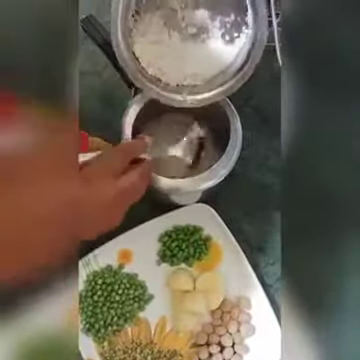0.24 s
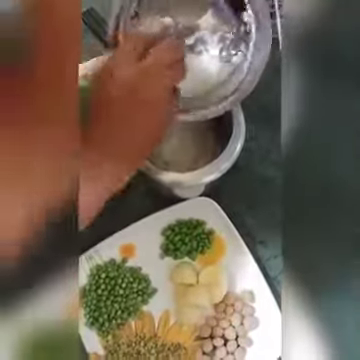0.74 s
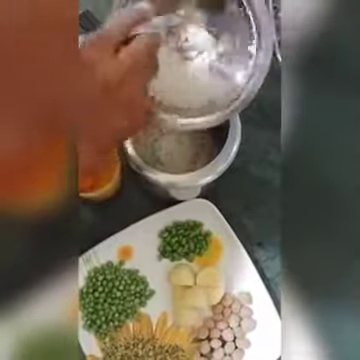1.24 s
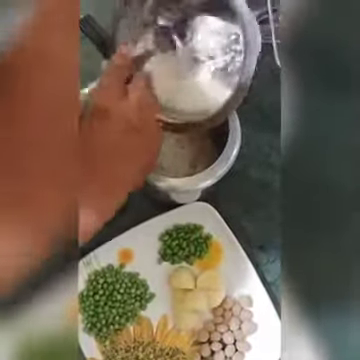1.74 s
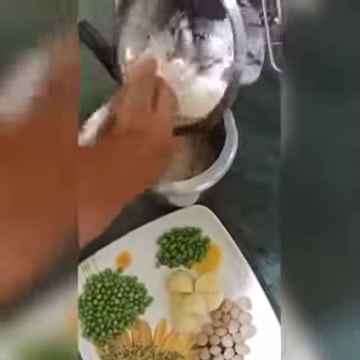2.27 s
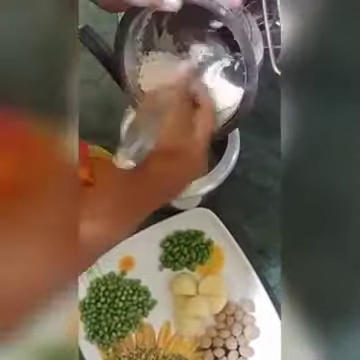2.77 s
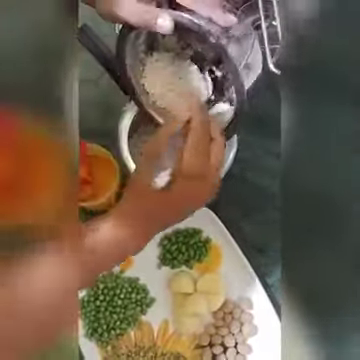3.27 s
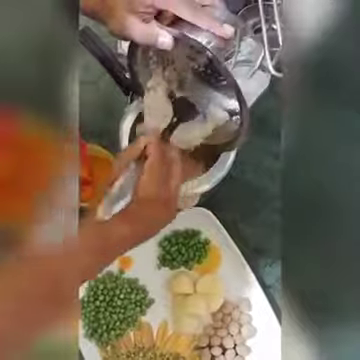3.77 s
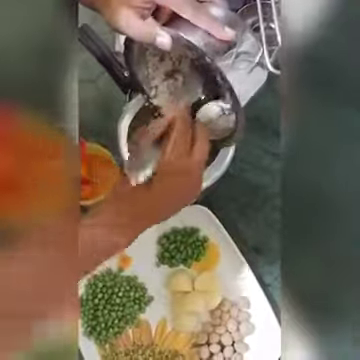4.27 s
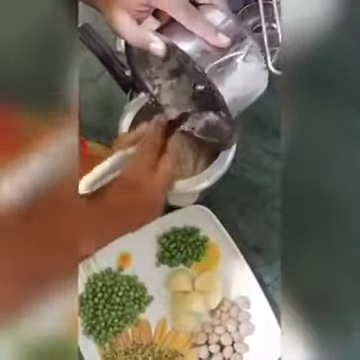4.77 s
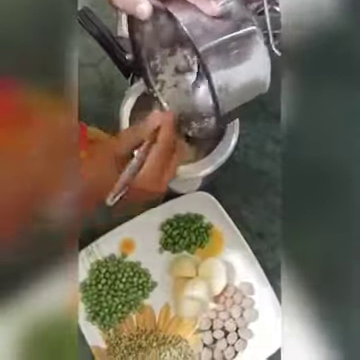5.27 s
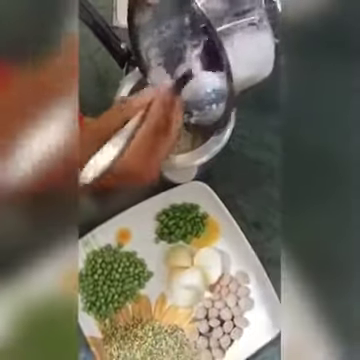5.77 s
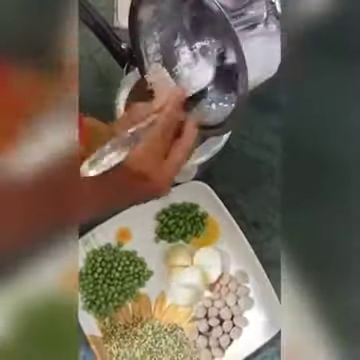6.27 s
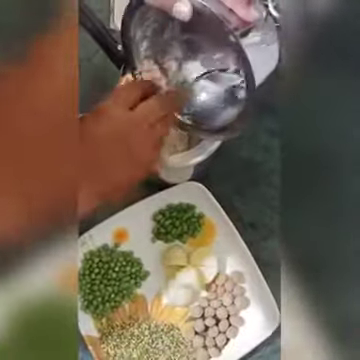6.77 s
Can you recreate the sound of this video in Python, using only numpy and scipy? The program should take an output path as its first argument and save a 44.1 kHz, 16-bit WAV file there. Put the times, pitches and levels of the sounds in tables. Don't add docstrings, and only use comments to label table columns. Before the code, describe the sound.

Sharp steel spoon clinks, low hollow thumps and gritty scrapes as damp rice is knocked from a thin metal bowl, close in a small kitchen.

```python
import sys
import numpy as np
from scipy import signal
from scipy.fft import rfft, irfft, next_fast_len
from scipy.io import wavfile
from scipy.ndimage import uniform_filter1d, map_coordinates

SR = 44100
rng = np.random.default_rng(int(sys.argv[2]) if len(sys.argv) > 2 else 0)


def nominal_scale(level):
    x = np.asarray(level, float) / 20
    return 10 ** x


def file_out(sig):
    cols = np.atleast_2d(sig).T
    lim = np.clip(cols, -1, 1)
    pcm = np.round(lim * 32767).astype(np.int16)
    wavfile.write(sys.argv[1], SR, pcm)


N = 309141
RING = 12000


def unit(x):
    return x / np.sqrt(np.mean(x ** 2) + 1e-20)


def along(points, hz):
    f, v = np.transpose(points)
    return np.interp(np.log(hz + 1), np.log(f + 1), v)


def filtered(x, response):
    m = next_fast_len(N + SR // 2)
    return irfft(rfft(x, m) * response(np.fft.rfftfreq(m, 1 / SR)), m)[..., :N]


def wobble(rate_hz):
    knots = rng.standard_normal(int(N * rate_hz / SR) + 4)
    return map_coordinates(knots, [np.arange(N) * rate_hz / SR])


def floor():
    # f/Hz, level/dB per Hz
    quiet = [(15, -67.5), (25, -7), (33, -13), (134, -9.5), (195, -12.5), (277, -22), (354, -9.5),
             (384, -21.5), (545, -17), (591, -31), (714, -19), (4140, -33), (7920, -39.5), (16000, -53.5)]
    level_db = -61.5 + 2.0
    likeness = [(40, .4), (200, .7), (1200, .05)]  # f/Hz, port correlation
    a, b = rng.standard_normal((2, N))

    def turn(hz):
        return np.arccos(np.clip(along(likeness, hz), 0, 1)) / 2

    mid = filtered(a, lambda hz: nominal_scale(along(quiet, hz)) * np.cos(turn(hz)))
    side = filtered(b, lambda hz: nominal_scale(along(quiet, hz)) * np.sin(turn(hz)))
    return nominal_scale(level_db + 0.71 * wobble(3.5)) * unit(np.array([mid + side, mid - side]))


def kitchen(x):
    # f/Hz, t60/s
    decay = [(200, 0.14), (2000, 0.15), (10000, 0.093)]
    # f/Hz, level/dB
    wet_db = [(100, -13.5), (500, -7.5), (1500, 1.5), (8000, -0.5)]
    hop, delay = SR // 6, 60
    starts = range(0, N, hop)
    hz, t, z = signal.stft(rng.standard_normal((len(starts), 2, SR // 3)), SR, nperseg=256)
    tails = signal.istft(z * nominal_scale(-60 * t / along(decay, hz)[:, None]), SR, nperseg=256)[1]
    tails /= np.linalg.norm(tails, axis=2, keepdims=True)
    padded = np.pad(x, (hop, 2 * hop))
    wet = np.zeros((2, N + SR + hop))
    fade = np.sin(np.pi * np.arange(2 * hop) / (2 * hop))
    for start, tail in zip(starts, tails):
        piece = padded[start:start + 2 * hop] * fade
        answer = signal.fftconvolve(piece[None], tail, axes=1)
        wet[:, start:start + answer.shape[1]] += answer
    return filtered(wet[:, hop - delay:][:, :N], lambda f: nominal_scale(along(wet_db, f)))


def grit(per_second, spread_db):
    draw = rng.random((3, N))
    size = nominal_scale(-spread_db * np.log(draw[2] + .03))
    ticks = (draw[0] < per_second / SR) * np.sign(draw[1] - .5) * size
    return unit(ticks) + 0.55 * rng.standard_normal(N)


def patchy(x, depth_db):
    z = signal.stft(x, nperseg=256)[2]
    field = uniform_filter1d(rng.standard_normal(z.shape), size=4, axis=0)
    field = uniform_filter1d(field, size=12, axis=1)
    return unit(signal.istft(z * nominal_scale(depth_db * unit(field)), nperseg=256)[1][:N])


def peaks(start, hold, db, rise_db_per_s, fall_db_per_s):
    t = np.arange(0, N / SR + .002, .001)[:, None]
    early = np.clip(start - t, 0, None)
    late = np.clip(t - start - hold, 0, None)
    gain = np.linalg.norm(nominal_scale(db - rise_db_per_s * early - fall_db_per_s * late), axis=1)
    return np.interp(np.arange(N) / SR, t[:, 0], gain)


def resonances(hz, modes):
    return sum((-1) ** k * nominal_scale(db) * 1j * hz * w / (c * c - hz * hz + 1j * hz * w)
               for k, (c, w, db) in enumerate(modes))


def strokes():
    # start t/s, hold/s, hiss level/dB, steel under it/dB
    scrapes = [(0.269, .008, -34, -27), (0.334, 0.027, -38, -40), (0.804, 0.18, -44.5, -7),
               (0.913, 0.045, -26, -26), (1.308, 0.027, -29.5, -12), (1.618, 0.16, -28, -16),
               (2.083, .17, -34, -6.5), (2.507, 0.11, -33, -33), (2.905, .04, -35.5, -9),
               (2.967, 0.061, -24, -27), (3.277, .15, -34, -15.5), (3.51, 0.15, -52, 9),
               (4.03, 0.081, -36, -21), (4.16, 0.19, -36, -6.5), (4.517, 0.082, -32.5, -18),
               (4.657, 0.072, -46.5, -4), (4.815, 0.081, -43, -13), (4.95, 0.085, -31.5, -3),
               (5.13, 0.1, -40.5, 4.5), (5.245, 0.087, -36.5, -8), (5.474, 0.018, -41, -3.5),
               (5.522, 0.051, -29.5, -19.5), (5.9, 0.082, -27.5, -43), (6.293, 0.035, -34, -13),
               (6.357, 0.04, -25, -11), (6.46, 0.076, -47.5, 0), (6.707, 0.098, -39, -15),
               (6.788, .01, -30.5, -3.5), (6.846, 0.11, -38.5, -1), (6.918, 0.0059, -32.5, -7)]
    # start t/s, hold/s, hiss level/dB
    trickles = [(0.693, 0.065, -54), (1.115, 0.09, -67.5), (1.494, 0.012, -64), (1.907, 0.036, -63),
                (2.333, 0.064, -56.5), (3.175, 0.038, -55), (3.653, 0.052, -58), (3.763, 0.14, -69.5),
                (3.913, 0.089, -50.5), (5.36, .08, -50.5), (2.664, 0.056, -59), (5.724, 0.017, -62),
                (6.18, .04, -54)]
    # t/s, steel drag level/dB, hollow rumble level/dB, fade/dB per s
    slides = [(0.0, -49, -50, 215), (0.789, -38.5, -30.5, 333), (0.92, -49, -41.5, 252),
              (1.33, -56, -43.5, 200), (1.499, -56, -42.5, 305.5), (1.59, -39.5, -40, 151),
              (2.078, -22.5, -31.5, 131), (2.562, -46, -38.5, 202), (2.89, -48, -35.5, 154.5),
              (3.269, -34.5, -32, 184), (3.411, -41, -42, 224), (3.6, -35.5, -35, 115.5),
              (3.91, -55, -37.5, 220), (4.16, -33.5, -27.5, 115), (4.623, -31.5, -30.5, 93),
              (4.81, -40, -31.5, 197.5), (4.88, -21.5, -49, 257), (5.001, -22.5, -53, 149),
              (5.298, -42, -36.5, 339), (5.658, -44, -30, 198.5), (5.888, -37, -33.5, 265),
              (6.018, -30, -26, 218), (6.29, -21.5, -27.5, 250), (6.374, -32.5, -31.5, 202),
              (6.688, -25, -25.5, 224), (6.789, -30.5, -32, 253), (6.905, -30, -36.5, 332)]
    # f/Hz, level/dB per Hz
    hiss_shape = [(2060, -27.5), (3500, -12.5), (4100, -13.5), (4400, -11.5), (4810, -11), (5500, -4.5),
                  (7040, -9.5), (8210, 1), (10100, -24), (11100, -20), (14400, -16.5), (15400, -20),
                  (16000, -65)]
    # f/Hz, level/dB per Hz
    drag_shape = [(470, -23), (800, -3), (1390, -8.5), (1750, -7.5), (1920, -14), (2450, -5.5), (5000, -14),
                  (6500, -21.5), (11000, -120)]
    # f/Hz, level/dB per Hz
    rumble_shape = [(35, -25.5), (60, 2.5), (146, -1), (264, -7.5), (300, -2.5), (373, -3), (419, -3),
                    (683, -2.5), (1300, -27.5), (1690, -57.5), (2860, -120)]
    # f/Hz, width/Hz, level/dB
    bowl_modes = [(304.8, 3.6, 0), (524.5, 5.3, -6.5), (630, 16, -33.5), (765, 4.9, -5), (1148, 90, -9),
                  (1590, 25, -13)]
    trickle_steel_db, scrape_rumble_db = -5, -10.5
    rumble_fade = 0.73
    rest_db = -67
    start, hold, db, steel_db = np.transpose(scrapes + [(*row, trickle_steel_db) for row in trickles])
    s, drag_db, rumble_db, fade_db_per_s = np.transpose(slides)

    def scrape(level_db):
        return peaks(start, hold, level_db, rise_db_per_s=556.5, fall_db_per_s=479)

    def slide(level_db, slower):
        return peaks(s, 0, level_db, rise_db_per_s=1504, fall_db_per_s=slower * fade_db_per_s)

    def steel(shape, share):
        return lambda hz: nominal_scale(along(shape, hz)) * (1 + share * resonances(hz, bowl_modes))

    pressed = scrape(db + steel_db)
    press_db = 1.3 * wobble(35)
    hiss = filtered(grit(3100, spread_db=6.0), lambda hz: nominal_scale(along(hiss_shape, hz)))
    hiss = patchy(hiss, depth_db=2.8)
    drag = patchy(filtered(grit(1400, spread_db=3.5), steel(drag_shape, share=0.82)), depth_db=3.5)
    rumble = patchy(filtered(grit(900, spread_db=1.0), steel(rumble_shape, share=4.9)), depth_db=1.0)
    hiss *= scrape(db) * nominal_scale(-1.5 + press_db + 1.46 * wobble(78))
    drag *= np.hypot(pressed, slide(drag_db, 1)) * nominal_scale(-4 + press_db + 0.65 * wobble(46))
    rumble *= np.hypot(nominal_scale(scrape_rumble_db) * pressed, slide(rumble_db, rumble_fade)) + nominal_scale(rest_db)
    return hiss + drag + rumble * nominal_scale(-1.0 + 0.65 * wobble(23))


def dense_modes(count, spectrum, uneven_db, centre_hz, lift_db):
    hz = np.fft.rfftfreq(RING, 1 / SR)
    draw = rng.random((count, 2, len(hz)))
    near = np.exp(-(np.log((hz + 1) / np.reshape(centre_hz, (-1, 1))) / 0.26) ** 2)
    chance = -np.log(draw[:, 0] + .01)
    level = nominal_scale(along(spectrum, hz) + lift_db * near + uneven_db * chance)
    rings = irfft(level * np.exp(2j * np.pi * draw[:, 1]))
    return rings / rings.std(axis=1, keepdims=True)


def tones(hz, drift):
    walk = np.cumsum(rng.standard_normal((len(hz), RING)), axis=1)
    return np.sqrt(2) * np.sin(2 * np.pi * hz[:, None] * np.arange(RING) / SR + drift * walk)


def blows(times, rings, t60, rise_ms):
    out = np.zeros(N + SR)
    t = np.arange(RING) / SR
    decay = nominal_scale(-60 * t / np.clip(t60, .01, .45)[:, None])
    rise = (1 - np.exp(-1000 * t / np.clip(rise_ms, .1, 40)[:, None])) ** 2
    shape = decay * rise
    for s, ring in zip(times, rings * shape / shape.max(axis=1, keepdims=True)):
        out[round(s * SR):][:len(t)] += ring
    return out[:N]


def thumps():
    # t/s, peak level/dB, strongest mode f/Hz, t60/s
    heavy = [(0.76, -5, 852, 0.075), (0.885, -16, 745, 0.15), (1.261, -22.5, 523, 0.1),
             (1.292, -0.5, 508.6, 0.14), (1.544, 1, 757, 0.092), (1.978, -21.5, 621, 0.55),
             (2.039, -12, 675.6, 0.22), (2.084, -21, 656, 0.053), (2.099, -29, 308.4, .45),
             (2.451, -17.5, 510, 0.13), (2.861, -11.5, 672, 0.073), (3.225, -4, 551.7, 0.13),
             (3.51, -29, 406, 0.12), (3.884, -20, 315, 0.11), (4.118, -8, 549, 0.13),
             (4.777, -7.5, 537, 0.062), (4.873, -14, 942, 0.16), (4.923, -17.5, 480, 0.3),
             (5.176, -12, 378.4, 0.2), (5.648, -20, 482, 0.13), (5.856, -13, 695, 0.086),
             (6.008, -16.5, 316, 0.14), (6.224, -7.5, 322.3, 0.19), (6.249, -15, 675, 0.24),
             (6.544, -13.5, 309.4, 0.39), (6.642, -2, 301, 0.046), (6.656, -9, 663, 0.17)]
    # t/s, peak level/dB, strongest mode f/Hz
    nudges = [
        (0.709, -33, 498),
        (1.159, -38, 397),
        (1.495, -33, 513),
        (1.577, -14.5, 745),
        (3.59, -29.5, 876),
        (4.478, -36, 805),
        (4.626, -27, 484),
        (5.302, -30.5, 754),
        (5.56, -33, 807),
        (6.904, -28, 644),
    ]
    # f/Hz, level/dB per Hz
    hollow_shape = [(120, -61), (200, -28.5), (266, -10), (333, -5), (694, -2.5), (889, -10), (1200, -13),
                    (1560, -62), (2640, -120)]
    # f/Hz, level/dB per Hz
    thud_shape = [(40, -50), (80, -3), (150, 2.5), (250, -5.5), (400, -25.5), (800, -120)]
    nudge_t60 = 0.16
    s, db, hz, t60 = np.transpose(heavy + [(*row, nudge_t60) for row in nudges])
    rise_ms = 1000 * 0.017 * t60
    thud_db = -31 + 0.5 * db
    dense = dense_modes(len(s), hollow_shape, uneven_db=3.0, centre_hz=hz, lift_db=8.5)
    hollow = nominal_scale(db - 10)[:, None] * (0.94 * dense + 0.88 * tones(hz, drift=0.014))
    thud = dense_modes(len(s), thud_shape, uneven_db=5.0, centre_hz=139, lift_db=3.5)
    thud = nominal_scale(thud_db)[:, None] * thud
    return blows(s, hollow, t60, rise_ms) + blows(s, thud, 2.3 * t60, 0.51 * rise_ms)


def clinks():
    # t/s, peak level/dB, mid ring level/dB, strongest mid mode f/Hz, t60/s
    landings = [(0.761, -9, -11, 3380, 0.074), (0.886, -4.5, -18.5, 2024, 0.034),
                (1.2499, -9, -22, 2930, 0.2), (1.289, -4.5, -15.5, 3615, 0.14),
                (1.5431, -11.5, -13, 1074, 0.17), (1.977, -13.5, -18, 3570, 0.081),
                (2.0343, -9, -7.5, 2650, 0.15), (2.0598, -14, -7.5, 2600, 0.21),
                (2.4512, -12.5, -16.5, 1007, 0.13), (2.8611, -14.5, -8, 1840, 0.097),
                (3.2142, -5.5, -16, 3015, 0.31), (3.5114, -23.5, -1, 1754, 0.065),
                (4.1134, -6.5, -17, 3510, 0.15), (4.777, -7, -18, 3010, 0.23),
                (4.925, -5.5, -16, 1167, 0.13), (5.0039, -14.5, -22.5, 2230, 0.28),
                (5.181, -5, -17, 1193, 0.22), (5.8581, -18.5, -20.5, 1520, 0.18),
                (6.2231, -26, -3.5, 1116, 0.28), (6.2455, -12.5, -10, 1757, 0.22),
                (6.544, -4, -15.5, 3273, 0.22), (6.6416, -11.5, -14, 1639, 0.28),
                (6.901, -5, -14, 1543, 0.073)]
    # t/s, peak level/dB, mid ring level/dB, strongest mid mode f/Hz
    grazes = [(0.7075, -41, -8, 3330), (1.0967, -45.5, -21, 3060), (1.1607, -48.5, -8, 3250),
              (1.495, -37.5, -18, 1160), (2.0194, -20.5, -12.5, 1670), (3.5869, -42.5, 9, 1104),
              (3.8843, -38.5, -20, 1080), (4.4876, -35, -18, 1000), (4.8732, -31, -2, 1484),
              (5.0777, -18, -16, 2980), (5.2967, -23.5, -8.5, 1520), (5.5917, -17, -18, 3420),
              (5.6485, -28.5, -11.5, 1605), (5.9804, -12.5, -41, 3580), (6.0091, -15, -18.5, 1715)]
    # f/Hz, level/dB per Hz
    edge_shape = [(2060, -19.5), (3500, -3), (4690, -4.5), (4940, -1.5), (5770, 0.5), (6870, -7), (8190, 3),
                  (8620, -7.5), (10000, -16.5), (11300, -17), (14700, -17.5), (15300, -16), (16500, -70.5)]
    # f/Hz, level/dB per Hz
    wall_shape = [(470, 3.5), (800, -5.5), (1380, -1), (1630, 1.5), (2430, -1.5), (3200, 2), (4360, -30),
                  (5000, -23.5), (6500, -53), (11000, -120)]
    landing_rise_ms, graze_rise_ms, graze_t60 = 1.01, 1.1, .11
    events = [(*row, landing_rise_ms) for row in landings]
    events += [(*row, graze_t60, graze_rise_ms) for row in grazes]
    s, db, mid_db, hz, t60, rise_ms = np.transpose(events)
    empty = (s[:, None] / 7) ** 2
    bright = dense_modes(len(s), edge_shape, uneven_db=3.5, centre_hz=2 * hz, lift_db=0.5)
    bright = nominal_scale(db - 11.5)[:, None] * bright
    dense = dense_modes(len(s), wall_shape, uneven_db=3, centre_hz=hz, lift_db=3)
    ahead = (.3 + .75 * empty) * tones(hz, drift=.025)
    rim = sum(tones(np.full(len(s), mode_hz), drift=0.0083) for mode_hz in (1525, 3285))
    wall = nominal_scale(db + mid_db - 3.0)[:, None] * (dense + ahead + 0.43 * empty * rim)
    crack = blows(s, 1.07 * bright + 1.01 * wall, t60=0.094 * t60, rise_ms=2.0 * rise_ms)
    return blows(s, bright, t60, rise_ms) + blows(s, wall, 0.87 * t60, rise_ms) + crack


def scene():
    def weak_bass(hz):
        return (1j * hz / (110 + 1j * hz)) ** 2

    bowl = filtered(clinks() + thumps() + strokes(), weak_bass)
    half_lag = SR * (0.0001194 + .000055 * wobble(7))
    direct = np.array([map_coordinates(bowl, [np.arange(N) + side * half_lag]) for side in (1, -1)])
    return nominal_scale(-1.5) * direct + kitchen(bowl) + floor()


def emptied_bands(x, margin_db, chance_db):
    # f/Hz, level/dB
    empties_first = [(1700, -1), (3200, 0), (3750, 3), (4300, 0), (9400, -3), (10300, 7), (11300, 10),
                     (12200, -2)]
    hz, _, z = signal.stft(x, SR, nperseg=1024)
    f = hz[:510, None]
    power = np.sum(np.abs(z[:, :510]) ** 2, axis=0)
    band = np.repeat(power.reshape(102, 5, -1).mean(axis=1), 5, axis=0)
    treble = power * np.clip(f / 2200, 0, 1) ** 4
    mask = uniform_filter1d(uniform_filter1d(treble, size=70, axis=0), size=3, axis=1)
    luck = uniform_filter1d(rng.standard_normal((102, z.shape[2])), size=7, axis=1)
    luck_db = chance_db * np.repeat(unit(luck), 5, axis=0)
    need = mask * nominal_scale(2 * (margin_db + along(empties_first, f) + luck_db))
    empty = (uniform_filter1d(band, size=3, axis=1) < need) & (f > 1700) & (mask > 3e-8)
    z[:, :510] *= np.where(empty, .03, 1)
    return signal.istft(z, SR, nperseg=1024)[1][:, :N]


def band_limit(x):
    return signal.sosfilt(signal.butter(12, 16860, fs=SR, output="sos"), x)


def record(dry):
    # f/Hz, left minus right level/dB
    port_db = [(60, 6.5), (110, 2.5), (200, 2.5), (380, 5), (700, 4), (1290, 3), (2380, 2.5), (4400, -1.5),
               (8120, 9.5), (15000, 11)]
    side = np.array([[.5], [-.5]])

    def edges(hz):
        return np.clip((15250 - hz) / 300, 0, 1) * 1j * hz / (25 + 1j * hz)

    ports = filtered(dry, lambda hz: nominal_scale(side * along(port_db, hz)) * edges(hz))
    thinned = emptied_bands(ports, margin_db=-10.5, chance_db=6)
    clipped = thinned / (1 + np.abs(thinned) ** 8) ** (1 / 8)
    return band_limit(clipped)


dry = scene()
out = record(dry)
file_out(out)
```